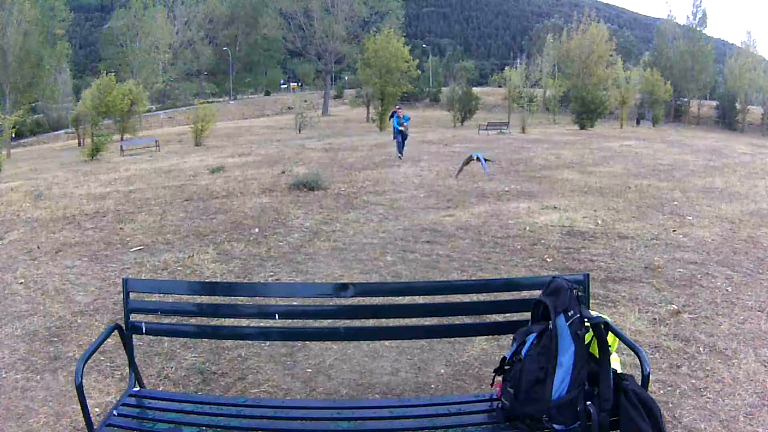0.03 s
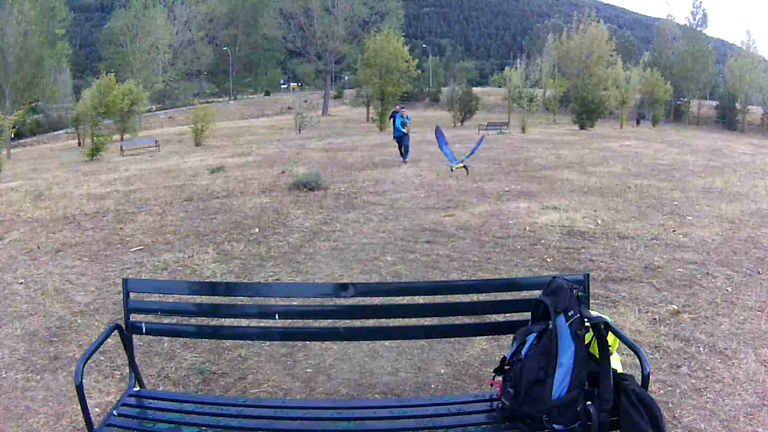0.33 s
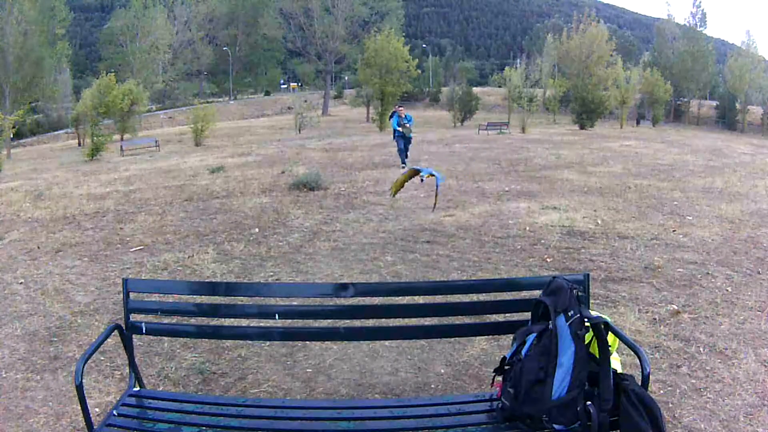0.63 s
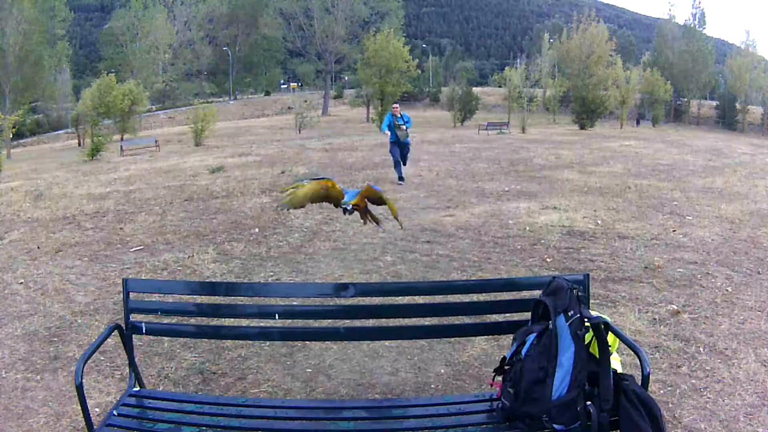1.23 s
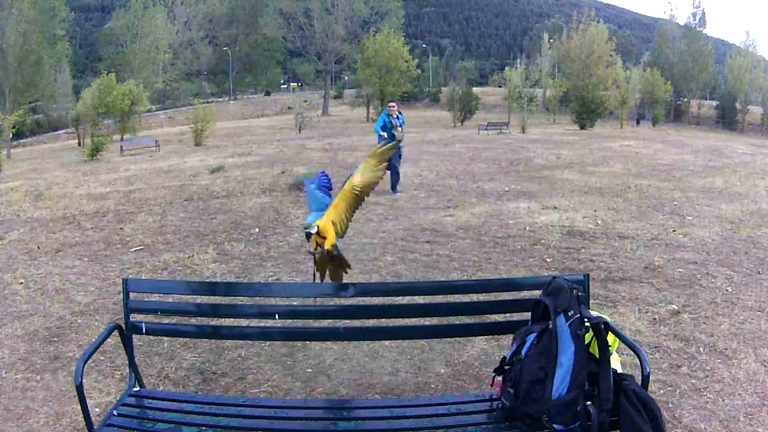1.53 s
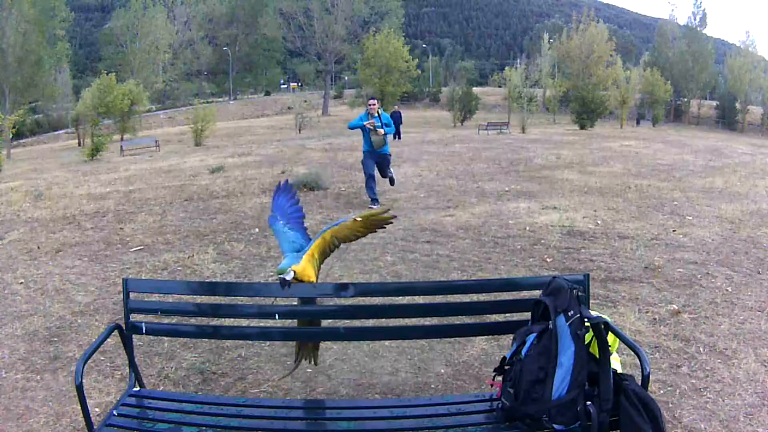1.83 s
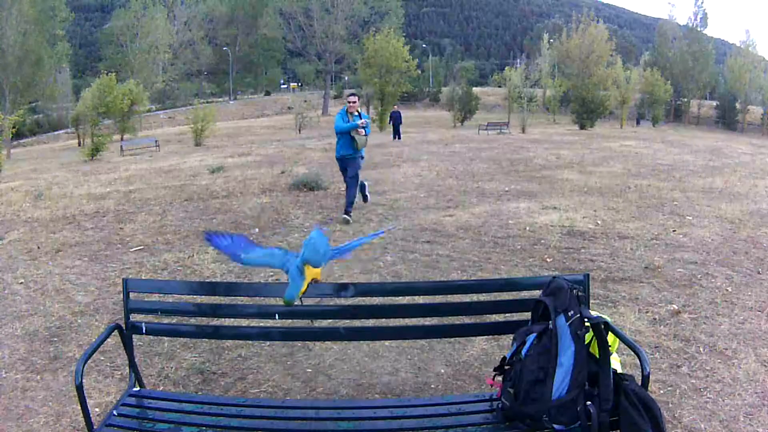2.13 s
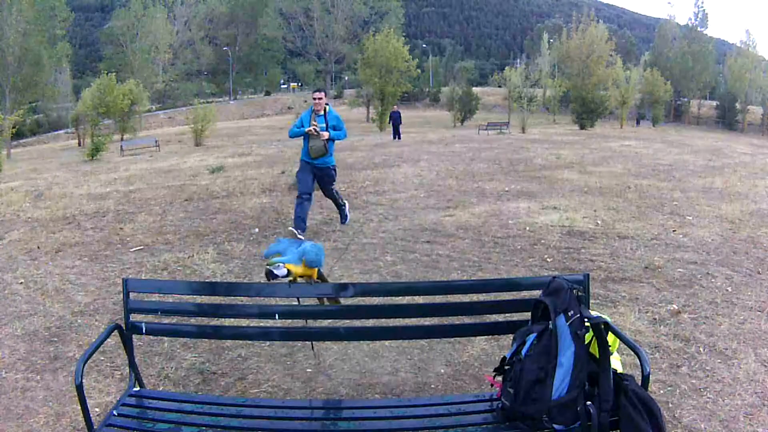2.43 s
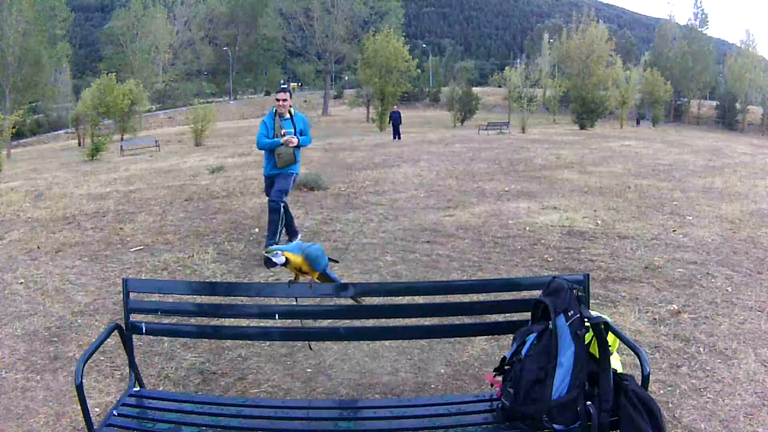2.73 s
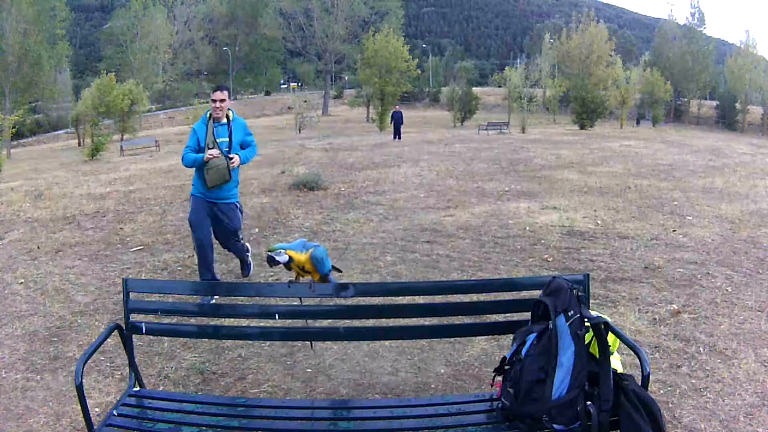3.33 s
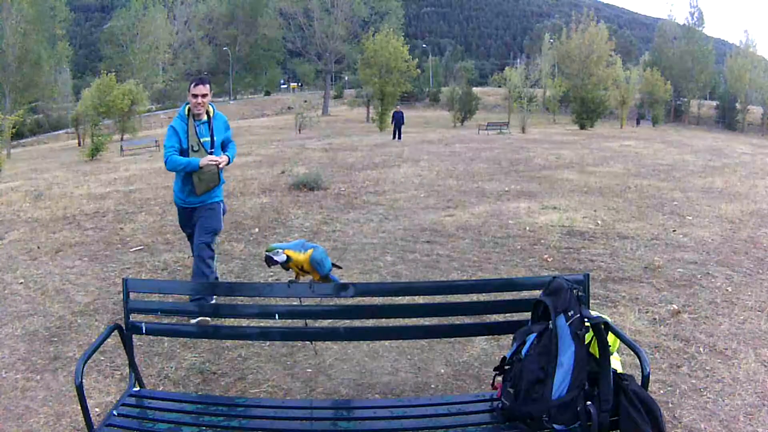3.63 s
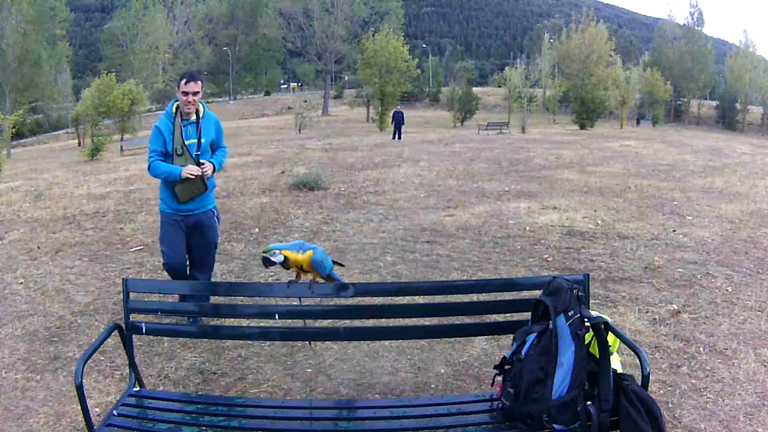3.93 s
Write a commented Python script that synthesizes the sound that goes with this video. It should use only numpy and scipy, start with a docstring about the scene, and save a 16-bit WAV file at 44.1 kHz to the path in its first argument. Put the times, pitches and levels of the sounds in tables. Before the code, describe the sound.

A parrot's claws clank on a metal bench, a quick cluster of ringing taps and rattles about halfway through. Before and after, wind rumbles and buffets the microphone over the faint hush of an open field.

```python
"""Parrot landing on a park bench

A metal bench by an open field, heard in mono. A large parrot lands on the backrest: its claws
clank on the top slat and shift their grip, ringing the slat and rattling the frame; once a claw
slips with a snap. Right at the microphone, wind rumbles, buffets and flutters in the stronger
gusts, with a faint moan near the end. Behind it all lies the hush of the field."""
import sys
import numpy as np
from scipy import signal
from scipy.fft import rfft, irfft, next_fast_len
from scipy.io import wavfile
from scipy.ndimage import uniform_filter1d, map_coordinates

SR = 44100
rng = np.random.default_rng(int(sys.argv[2]) if len(sys.argv) > 2 else 0)


def store_pcm(level_fs):
    """Save levels as 16-bit WAV."""
    pcm = np.round(np.clip(level_fs, -1, 1) * 32767).astype(np.int16)
    wavfile.write(sys.argv[1], SR, np.atleast_2d(pcm).T)


N = 176400

# colour of the field's hush: f/Hz, density/dB
FIELD_SPECTRUM = [(100, 5), (500, -3), (1100, 1.5), (1700, -6.5), (2800, -10), (4500, -13.5), (9000, -15),
                  (13500, -16), (15700, -20.5)]
# gusts rumbling on the microphone: t/s, level/dB
RUMBLE_GUSTS = [(0.04, -46.5), (0.15, -38), (0.26, -43.5), (0.44, -38.5), (0.72, -53.5), (0.8, -46.5),
                (0.87, -52), (0.96, -43.5), (1.11, -47), (1.22, -42.5), (1.62, -46.5), (2.18, -47),
                (2.27, -39.5), (2.71, -38.5), (2.99, -44), (3.05, -33), (3.16, -45), (3.19, -40.5),
                (3.49, -39.5), (3.75, -52.5), (3.8, -40), (3.96, -41.5)]
# colour of the rumble: f/Hz, density/dB
RUMBLE_SPECTRUM = [(10, 2), (25, -0.5), (45, 1.5), (70, -6), (110, -13.5), (170, -23.5), (260, -31),
                   (500, -48.5), (1500, -100)]
# gusts fluttering on the microphone: t/s, level/dB
FLUTTER_GUSTS = [(0, -58), (.42, -55), (.6, -63), (.88, -65), (1.15, -59), (1.7, -61), (2.2, -62),
                 (2.29, -52), (2.38, -54), (2.52, -49), (2.9, -55), (3.03, -52), (3.3, -57), (3.48, -55),
                 (3.68, -59), (4, -57)]
# colour of the flutter: f/Hz, density/dB
FLUTTER_SPECTRUM = [(50, -8), (100, 1.5), (170, -1.5), (250, -11), (350, -16), (480, -18.5), (700, -27.5),
                    (1200, -41.5), (3000, -62)]
# eddies hitting the microphone: peak t/s, half length/s, level/dB, roll-off f/Hz
EDDY_HITS = [(0.11, 0.0067, -52.5, 296), (0.304, 0.009, -49.5, 295), (0.405, 0.0084, -54, 393),
             (0.436, 0.0043, -45.5, 377), (0.459, 0.0084, -54.5, 390), (0.672, 0.01, -54, 220),
             (0.967, 0.0041, -43, 117), (1.252, 0.018, -49, 146), (1.531, 0.0089, -55, 210),
             (1.64, 0.0024, -64.5, 1180), (2.426, 0.0025, -45.5, 256), (2.518, 0.015, -57, 756),
             (2.54, 0.0088, -54.5, 584), (2.624, 0.0096, -38.5, 49), (2.659, 0.013, -53.5, 734),
             (2.688, 0.0068, -34, 215), (2.691, 0.0049, -47, 630), (2.834, 0.01, -56, 510),
             (3.063, 0.033, -52, 410), (3.357, 0.0028, -49, 250)]
# claws striking the slat: t/s, ring gain/dB, clatter gain/dB, spot (0 landing to 1 perch),
# middle-mode boost/dB, top-mode boost/dB
CLAW_STRIKES = [(1.836, -62.5, -64, 0.041, -2, 5.5), (1.8485, -72, -68.5, 0, 8.5, 5),
                (1.926, -66.5, -69.5, 0.42, -4, -5), (2.0279, -82, -74, 0, -3, 14),
                (2.062, -76, -92, 1, -6, 4), (2.1428, -61, -66, 0.94, -4, -5),
                (2.167, -66, -66, 0.93, -11, -5), (2.2898, -68, -69.5, 1, -4, -7),
                (2.325, -77, -82, 0.51, 6, -8), (2.775, -93, -92, 1, -6, 12)]
# modes of the slat: f/Hz, gain struck at the landing spot/dB, gain struck at the perch/dB
SLAT_MODES = [(1599, -10, -14), (1855, -12, .5), (1905, -8, -6.5), (1950, -4.5, -12), (2120, -7, -16),
              (2826, -17, -9.5), (2977, -16, -7.5), (3457, -3.5, -3), (3548, -3, -5), (3595, -6, -11),
              (3690, -12, -7), (3744, -6.5, -6), (3960, -13, -14), (4960, -28, -7), (5310, -11, -7),
              (5395, -5, -6), (5455, -6, -14), (5550, -2.5, -7), (5645, -8, -16), (10157, -.5, 1),
              (10254, -4, -3.5)]
# ring time of the slat: f/Hz, t60/s
SLAT_DECAY = [(1900, .55), (3600, .43), (5400, .205), (10200, .16)]
# colour of the frame's clatter: f/Hz, density/dB
FRAME_SPECTRUM = [(400, -10), (900, 2.5), (1500, 2), (2400, 1), (3600, -2.5), (4500, -8.5), (5400, -18),
                  (6300, -6), (8000, -2.5), (9400, -19), (10500, -3.5), (15000, -20)]
# ring time of the frame: f/Hz, t60/s
FRAME_DECAY = [(1000, 0.5), (3600, 0.43), (7000, 0.21), (14000, 0.14)]
# colour of a slipping claw: f/Hz, density/dB
SNAP_SPECTRUM = [(1500, -9), (3000, 0), (4800, -16), (10500, -15), (15000, -30)]
# colour of the wind's moan: f/Hz, density/dB
MOAN_SPECTRUM = [(200, -42), (330, -1.5), (420, -4), (1000, -72)]

MIDDLE_HZ, TOP_HZ = 4500, 8000  # where the bench's middle and top ranges begin


def amp(db):
    """Decibels to gain."""
    return 10 ** (np.asarray(db) / 20)


def unit(x):
    """Scale to rms 1."""
    return x / np.sqrt(np.mean(x ** 2) + 1e-20)


def along(points, hz):
    """Read (f/Hz, value) points at hz, on a log axis."""
    freqs, values = np.transpose(points)
    return np.interp(np.log(hz + 1), np.log(freqs + 1), values)


def curve(rows):
    """One value per sample from (t/s, value) rows."""
    return np.interp(np.arange(N) / SR, *np.transpose(rows))


def wobble(rate, size):
    """A smooth random curve, rate knots a second."""
    return map_coordinates(rng.standard_normal(1024), [np.arange(size) * rate / SR], mode="wrap")


def filtered(x, response):
    """Filter x by a gain given as a function of frequency."""
    padded = next_fast_len(len(x) + 8192)
    return irfft(rfft(x, padded) * response(np.fft.rfftfreq(padded, 1 / SR)), padded)[:len(x)]


def noise(spectrum, size):
    """Coloured noise of rms 1."""
    return unit(filtered(rng.standard_normal(size), lambda hz: amp(along(spectrum, hz))))


def steady(x, window):
    """Even out a noise's chance swells over a window of samples."""
    return x / np.sqrt(np.abs(uniform_filter1d(x * x, window)) + 1e-9)


def add(track, s, sound):
    """Mix a sound in at time s."""
    part = track[round(s * SR):][:len(sound)]
    part += sound[:len(part)]


def field_hush(level_db=-71):
    """The open field: a faint, even bed of noise."""
    return amp(level_db) * noise(FIELD_SPECTRUM, N)


def wind_rumble(swing_db=0.14):
    """Wind on the microphone: a low rumble that follows the gusts."""
    level_db = curve(RUMBLE_GUSTS) + swing_db * wobble(22.24, N)
    return amp(level_db) * steady(noise(RUMBLE_SPECTRUM, N), window=3000)


def wind_flutter(swing_db=2.5):
    """Stronger gusts flutter on the microphone, lumpy and above the rumble."""
    lumps = amp(swing_db * wobble(55, N))
    air = steady(noise(FLUTTER_SPECTRUM, N), window=2205)
    return amp(curve(FLUTTER_GUSTS)) * unit(lumps * air)


def wind_eddies(low_cut_hz=58.5, order=3.46):
    """Eddies hit the microphone, each a short swell of low turbulence."""
    out, t = np.zeros(N), np.arange(SR // 2) / SR
    for peak_s, half_s, db, rolloff_hz in EDDY_HITS:
        band = lambda f: f / np.hypot(f, low_cut_hz) / np.sqrt(1 + (f / rolloff_hz) ** (2 * order))
        turbulence = steady(filtered(rng.standard_normal(len(t)), band), window=660)
        start = max(peak_s - t[-1] / 2, 0)
        swell = np.exp(-.5 * ((start + t - peak_s) / half_s) ** 2)
        add(out, start, amp(db) * swell * turbulence)
    return out


def slat_ring(t, spot, middle_db, top_db, attack_s=.001, wander_rad=.75, scatter_db=1.2):
    """The slat's modes waver as the claws damp it; the spot struck sets their balance."""
    out = np.zeros(len(t))
    for hz, landing_db, perch_db in SLAT_MODES:
        phase = 2 * np.pi * (hz * t + rng.random()) + wander_rad * wobble(100, len(t))
        db = landing_db + spot * (perch_db - landing_db)
        db += top_db if hz > TOP_HZ else middle_db if hz > MIDDLE_HZ else 0
        db += scatter_db * rng.standard_normal()
        out += amp(db - 60 * t / along(SLAT_DECAY, hz)) * np.sin(phase)
    attack = 1 - np.exp(-t / attack_s)
    return out * attack / np.sqrt(2)


def frame_clatter(t, spot, bright_db=4.5):
    """Countless weak modes of the frame, the high ones dying first; brighter at the landing spot."""
    hz, age_s, spectra = signal.stft(noise(FRAME_SPECTRUM, len(t)), SR, nperseg=256)
    tilt_db = (1 - spot) * bright_db * np.tanh(np.log2((hz[:, None] + 1) / MIDDLE_HZ))
    decay_db = 60 * age_s / along(FRAME_DECAY, hz)[:, None]
    _, clatter = signal.istft(spectra * amp(tilt_db - decay_db), SR, nperseg=256)
    return clatter[:len(t)]


def claw_clanks():
    """Each claw contact rings the slat and rattles the frame."""
    out, t = np.zeros(N), np.arange(SR // 2) / SR
    for s, ring_db, clatter_db, spot, middle_db, top_db in CLAW_STRIKES:
        add(out, s, amp(ring_db) * slat_ring(t, spot, middle_db, top_db))
        add(out, s, amp(clatter_db) * frame_clatter(t, spot))
    return out


def claw_snap(start_s=2.1665, level_db=-55.5, t60_s=.018):
    """A claw slips on the metal with one dry snap."""
    out, t = np.zeros(N), np.arange(SR // 2) / SR
    add(out, start_s, amp(level_db - 60 * t / t60_s) * noise(SNAP_SPECTRUM, len(t)))
    return out


def wind_moan(peak_s=3.70, half_s=0.056, level_db=-63):
    """The wind moans faintly: a narrow band of noise swells and fades."""
    swell = np.exp(-.5 * ((np.arange(N) / SR - peak_s) / half_s) ** 2)
    return amp(level_db) * swell * noise(MOAN_SPECTRUM, N)


def scene():
    """Bench, wind and field as they meet at the one microphone."""
    bench = claw_clanks() + claw_snap()
    wind = wind_rumble() + wind_flutter() + wind_moan() + wind_eddies()
    return (bench + wind + field_hush())[None]


def record(dry):
    """The camera keeps nothing above its band limit and adds a constant, silent offset."""
    limit_hz, dc_offset = 15700, -.0195
    return np.array([filtered(x, lambda hz: hz < limit_hz) for x in dry]) + dc_offset


dry = scene()
out = record(dry)
store_pcm(out)
```